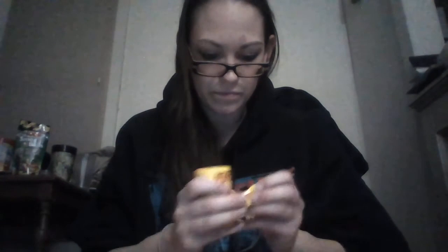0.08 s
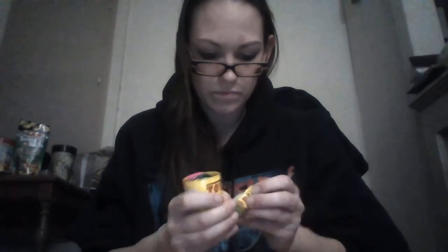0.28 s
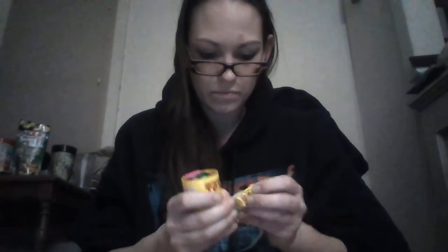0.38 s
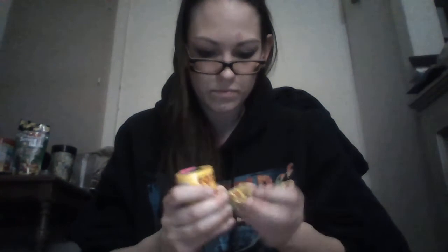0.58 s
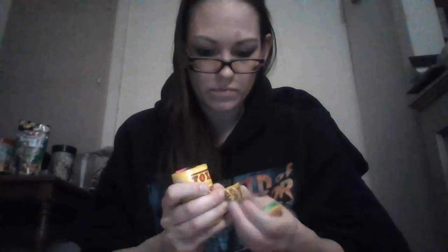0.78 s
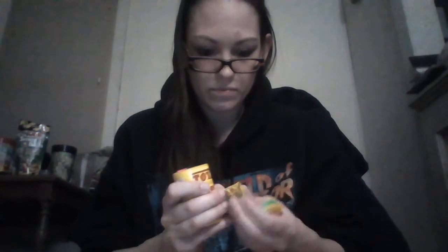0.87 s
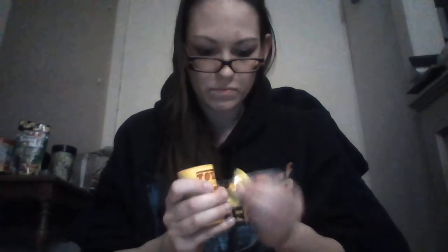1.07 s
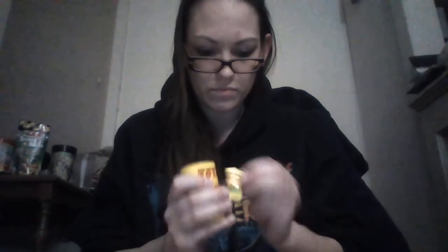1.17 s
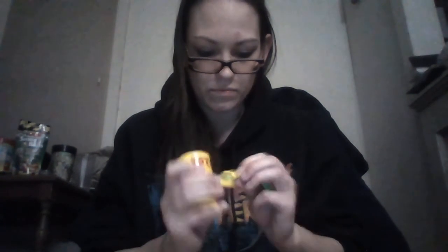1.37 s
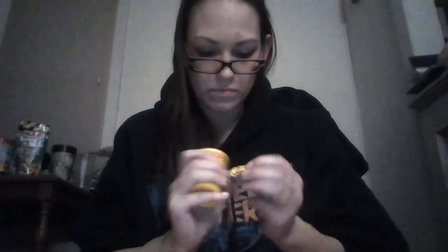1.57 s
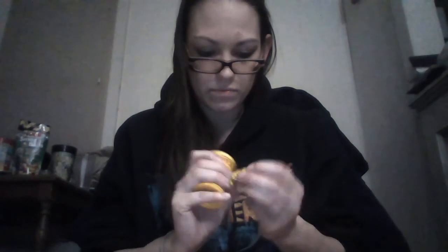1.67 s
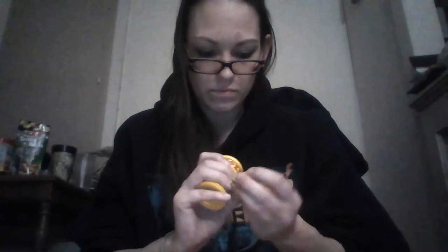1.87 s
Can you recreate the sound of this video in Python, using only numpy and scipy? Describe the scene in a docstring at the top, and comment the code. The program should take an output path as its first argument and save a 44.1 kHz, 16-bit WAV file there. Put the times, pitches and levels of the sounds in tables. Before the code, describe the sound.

Hands unwrap a small plastic-sealed tub indoors, with bright irregular crinkle clicks, brief scratchy rubbing and dull finger bumps; busiest before 1.2 seconds, then mostly quiet, the faint background hiss gated down between sounds.

```python
"""Unwrapping a small candy tub

Fingers pick and peel the plastic film off a small tub, close to the microphone in a small room.
Buckling film snaps: impulses ring its resonances. Rubbing is a train of tiny crackles in the same
resonances, sliding is noise in a few narrow ones, and finger bumps are short decaying tones with noise.
A noise suppressor turns each band down by up to 32 dB in the pauses; a limiter holds the loudest snaps."""
import sys
import numpy as np
from scipy import signal
from scipy.fft import rfft, irfft
from scipy.io import wavfile
from scipy.ndimage import uniform_filter1d, minimum_filter1d

SR = 44100
rng = np.random.default_rng(int(sys.argv[2]) if len(sys.argv) > 2 else 0)


def wrap_up_sound(samples):
    """Save the sound to the file named by the first command line argument, as 16-bit audio."""
    columns = np.atleast_2d(samples).T
    # keep every value between -1 and 1, then stretch to whole-number steps
    tamed = np.clip(columns, -1, 1)
    steps = np.round(tamed * 32767).astype(np.int16)
    wavfile.write(sys.argv[1], SR, steps)


N = 83790
TIME = np.arange(N) / SR

# resonances of the film, one list per register (deep, low, middle, high, top): # pitch_hz, width_hz,
# relative_level_db
FILM_REGISTERS = [
    [(965, 98, -5), (1175, 230, 2), (1714, 230, 9)],
    [(2362, 480, 0)],
    [(3550, 800, 0)],
    [(5386, 760, 0)],
    [(6732, 690, 20.5), (7600, 290, 10)],
]


def from_db(db):
    """Decibels are logarithmic: 20 dB is a tenfold amplitude gain."""
    return 10 ** (np.asarray(db) / 20)


def unit(x):
    """Energy is the sum of squared amplitudes; scale it to one."""
    return x / np.sqrt(np.sum(x ** 2) + 1e-30)


def coloured(x, spectrum):
    """Spectral shaping: weight each frequency of a noise, then scale to an energy of one."""
    hz, db = np.transpose(spectrum)
    bins_hz = np.fft.rfftfreq(len(x), 1 / SR) + 1   # the offset avoids log(0)
    gain = from_db(np.interp(np.log(bins_hz), np.log(hz), db))
    return unit(irfft(rfft(x) * gain, len(x)))


def resonate(x, hz, width_hz):
    """Stagger tuning: two resonators in a row, slightly apart, make a broad peak with steep skirts."""
    radius = np.exp(-np.pi * width_hz / np.sqrt(2) / SR)
    offset_hz = width_hz / np.sqrt(8)
    numerator = np.array([1, 0, -1]) * (1 - radius ** 2) / np.sqrt(2)
    for centre_hz in (hz - offset_hz, hz + offset_hz):
        denominator = [1, -2 * radius * np.cos(2 * np.pi * centre_hz / SR), radius ** 2]
        x = signal.lfilter(numerator, denominator, x + 1e-18)
    return x


def add(out, sound, start_s):
    """Superposition: sounds sum linearly from their start times."""
    i = max(int(start_s * SR), 0)
    out[i:i + len(sound)] += sound[:max(N - i, 0)]


def ring_film(force, modes):
    """Modal synthesis: a force rings the resonances of one register, retuned together each time."""
    pitch_scatter = 0.067   # every crease is tuned a little differently
    detune = 1 + pitch_scatter * rng.uniform(-1, 1)
    return sum(from_db(db) * resonate(force, hz * detune, width_hz) for hz, width_hz, db in modes)


def background_hiss():
    """Stationary noise: a faint random signal with a fixed spectrum."""
    # spectrum of the hiss: frequency_hz, relative_level_db
    hiss_colour = [(60, -12.5), (200, -10), (700, -11), (1500, -5), (4000, -7.5), (7000, 3), (8500, -12),
                   (10000, -34)]
    rms_db = -70
    return from_db(rms_db) * np.sqrt(N) * coloured(rng.standard_normal(N), hiss_colour)


def crackle_grains(n):
    """Stick-slip friction: sparse random impulses of uneven size whose strength flickers."""
    grains_per_s, spread_db = 1700, 3.7
    flicker_db, flicker_s = 1, 0.0013   # the grip sticks and slips
    signs = rng.choice([-1, 1], n)
    sizes = signs * from_db(spread_db * np.minimum(rng.exponential(1, n), 4))
    slow_noise = uniform_filter1d(rng.standard_normal(n), int(flicker_s * SR))
    flicker = np.sqrt(n) * unit(slow_noise)   # rms of one
    struck = rng.random(n) < grains_per_s / SR
    return sizes * struck * from_db(flicker_db * flicker)


def rubbing():
    """Friction-driven resonance: tiny crackles ring the film under the fingers; each grip retunes it."""
    # strokes of the fingers, and rms level per register: start_s, length_s,
    # low_level_db, middle_level_db, high_level_db, top_level_db
    strokes = [(0, 0.056, -62.5, -55, -51, -51), (0.078, 0.031, -66, -58, -58, -59),
               (0.196, 0.035, -61, -56.5, -53.5, -53.5), (0.263, 0.036, -76.5, -63, -51.5, -55),
               (0.307, 0.089, -89, -71.5, -53.5, -44.5), (0.41, .13, -64, -62.5, -68, -60.5),
               (0.55, .05, -69, -62.5, -66, -63), (0.696, 0.058, -71, -66.5, -60.5, -59),
               (0.825, 0.14, -58, -64, -62.5, -61), (0.962, 0.042, -46, -43, -40.5, -43),
               (0.999, 0.049, -56, -57, -56.5, -58), (1.122, 0.079, -61.5, -56.5, -59.5, -56),
               (1.209, 0.04, -63.5, -52.5, -52.5, -54.5), (1.342, 0.041, -82.5, -68.5, -65.5, -66.5),
               (1.408, 0.058, -65.5, -67, -59.5, -61.5), (1.482, 0.036, -73, -84, -87, -69),
               (1.806, 0.048, -78, -68.5, -70, -65.5)]
    edge_s = 0.0044
    deep_db = -6.5   # the deep register follows the low one
    grain_colour_db = 3.5   # every crackle has its own colour
    out = np.zeros(N)
    for start_s, length_s, low_db, *upper_db in strokes:
        t = TIME[:int((length_s + 2 * edge_s) * SR)]
        envelope = np.clip(np.minimum(t, t[-1] - t) / edge_s, 0, 1) ** 2
        grains = crackle_grains(SR // 4)
        levels_db = [low_db + deep_db, low_db, *upper_db]
        for modes, level_db in zip(FILM_REGISTERS, levels_db):
            force = grains * from_db(grain_colour_db * rng.standard_normal(len(grains)))
            ring = ring_film(force, modes)[:len(t)]
            add(out, from_db(level_db) * np.sqrt(len(t)) * unit(ring * envelope), start_s - edge_s)
    return out


def bumps():
    """Damped oscillation: fingers and nails knock softly on the tub and its rim, as tone plus dull noise."""
    # knocks: start_s, relative_peak_level_db, pitch_hz
    knocks = [(.005, -64, 530), (.1, -62.5, 215), (0.211, -62, 214.3), (0.236, -55.5, 410),
              (0.296, -58.5, 190), (.298, -51, 380), (.298, -59.5, 610), (0.365, -56.5, 290),
              (.4, -50.5, 115), (0.45, -54.5, 120), (0.484, -54, 580), (0.498, -61, 320), (.555, -68, 690),
              (0.573, -56.5, 170), (0.713, -54, 165), (0.711, -55.5, 335), (.716, -64, 720),
              (.84, -55, 240), (0.853, -46.5, 110), (.9, -59.5, 640), (0.95, -60.5, 330), (.95, -64.5, 110),
              (0.974, -63, 620), (1.02, -59.5, 330), (1.036, -56.5, 140), (1.126, -59.5, 130),
              (1.145, -60.5, 880), (1.16, -56, 310), (1.165, -60, 500), (1.186, -51.5, 110),
              (1.206, -53.5, 200), (1.211, -60, 330), (1.279, -61.5, 1580), (1.35, -64.5, 1900),
              (1.415, -65, 150), (1.446, -57, 295), (1.43, -63.5, 738), (1.485, -51, 1023),
              (1.485, -53, 1534), (1.485, -60.5, 2900), (1.492, -57.5, 620), (1.503, -68, 320.6),
              (1.514, -67.5, 820), (1.625, -62, 1560)]
    attack_s, decay_s, trim_db = 0.016, 0.0085, -3
    noise_share = 0.45   # amplitude of the noise beside the tone
    out, t = np.zeros(N), TIME[:SR // 8]
    envelope = (1 - np.exp(-t / attack_s)) ** 2 * np.exp(-t / decay_s)
    for start_s, level_db, hz in knocks:
        tone = unit(np.sin(2 * np.pi * hz * t))
        noise = unit(resonate(rng.standard_normal(len(t)), hz, hz))
        knock = envelope * (tone + noise_share * noise)
        add(out, from_db(level_db + trim_db) * knock / np.abs(knock).max(), start_s)
    return out


def buckle(slips=4):
    """Snap-through instability: the force jumps, rebounds, slips a few times and shivers out."""
    slip_span_s, slip_db = .001, -0.5
    rebound_s, rebound_db = 0.00076, -4.5   # the crease springs back, up to 30 % sooner or later
    shiver_s, shiver_db = 0.0036, -32   # the sheet shivers briefly
    t = TIME[:SR // 80]
    force = from_db(shiver_db) * rng.standard_normal(len(t)) * np.exp(-t / shiver_s)
    force[0] += 1
    rebound = int(rebound_s * rng.uniform(.7, 1.3) * SR)
    force[rebound] += from_db(rebound_db) * rng.choice([-1, 1])
    slip_at = (rng.random(slips) * slip_span_s * SR).astype(int)
    force[slip_at] += from_db(slip_db) * rng.standard_normal(slips)
    return force


def snaps():
    """Impulse excitation: each buckling rings the five registers with strengths of its own."""
    # film snaps, and relative level per register: peak_s,
    # deep_level_db, low_level_db, middle_level_db, high_level_db, top_level_db
    snap_events = [(0.0823, -48, -46.5, -39.5, -42, -43.5), (0.09, -55.5, -46, -40, -33, -39),
                   (0.1979, -80.5, -52, -46, -40, -37), (0.2352, -47, -45, -45.5, -46, -37.5),
                   (0.241, -36.5, -19.5, -11.5, -9.5, -6.5), (0.3091, -38.5, -32, -28.5, -18, -7.5),
                   (0.3633, -41, -36.5, -35, -15.5, -7.5), (0.4321, -44.5, -40.5, -36, -30, -22.5),
                   (0.4398, -45, -33, -35.5, -37, -27), (0.4817, -54, -33, -34.5, -31, -31),
                   (0.4846, -44.5, -32, -57, -30.5, -42), (0.5099, -56, -59, -62, -41, -44),
                   (0.5256, -55.5, -46, -47, -27.5, -28.5), (0.5691, -65, -58, -40, -37.5, -39),
                   (0.5935, -50, -57, -51.5, -81, -67), (0.7171, -59, -46.5, -39.5, -37.5, -47.5),
                   (0.7195, -51.5, -46, -33, -41, -32), (0.814, -61.5, -70, -44.5, -34.5, -39),
                   (0.8346, -33, -37, -21, -20, -15), (0.879, -35, -32.5, -25.5, -15, -17),
                   (0.8968, -42, -26, -21, -21.5, -22.5), (0.9013, -56, -46.5, -31, -20, -16),
                   (0.9281, -68, -56.5, -51.5, -28.5, -48), (0.9372, -56.5, -41.5, -49, -24.5, -27.5),
                   (0.9408, -54, -53.5, -27, -29, -30), (0.952, -41, -30, -18, -7, -26),
                   (0.9562, -32, -41.5, -22.5, -26, -32), (0.9644, -59, -49, -43, -29.5, -26),
                   (0.969, -34, -36.5, -20, -18, -20), (0.9928, -41.5, -38.5, -27, -27.5, -26.5),
                   (1.0257, -39, -34, -27, -31.5, -12.5), (1.0285, -43, -43.5, -37, -22, -27),
                   (1.1296, -66.5, -46.5, -40.5, -37.5, -33.5), (1.1354, -55, -57, -20.5, -23, -23.5),
                   (1.162, -58.5, -40.5, -28, -33, -35), (1.169, -48, -45.5, -32.5, -32.5, -22.5),
                   (1.1972, -49, -33.5, -31, -33, -34.5), (1.1997, -32, -23, -13, -11, -21.5),
                   (1.3572, -70, -78, -57.5, -38, -41), (1.4238, -39.5, -45.5, -37.5, -38.5, -46),
                   (1.4284, -45.5, -57, -34.5, -31.5, -31), (1.436, -48.5, -69, -41, -32.5, -44),
                   (1.4621, -78, -88, -69, -46, -42), (1.6376, -85, -84, -93, -51.5, -48.5),
                   (1.816, -86.5, -72.5, -43, -35.5, -34.5), (1.8928, -74, -40, -32, -37.5, -29)]
    lead_s, trim_db = .0004, -0.5   # the jump comes just before the peak
    out = np.zeros(N)
    scale = np.sqrt(.002 * SR)   # refers the level to rms over 2 ms
    for peak_s, *levels_db in snap_events:
        force = buckle()
        for modes, level_db in zip(FILM_REGISTERS, levels_db):
            ring = unit(ring_film(force, modes))
            add(out, from_db(level_db + trim_db) * scale * ring, peak_s - lead_s)
    return out


def sliding():
    """Smooth friction: a thin hiss holds a few narrow resonances of slowly sliding, taut film."""
    # slides: start_s, length_s, relative_level_db
    slides = [(.14, .05, -69), (.59, .115, -57)]
    # resonances of the stretched film: pitch_hz, width_hz, relative_level_db
    taut_modes = [(2200, 70, -11), (3900, 260, -3), (6900, 520, 0)]
    out = np.zeros(N)
    for start_s, length_s, level_db in slides:
        n = int(length_s * SR)
        ring = np.zeros(n)
        for hz, width_hz, mode_db in taut_modes:
            ring += from_db(mode_db) * unit(resonate(rng.standard_normal(n), hz, width_hz))
        faded = unit(ring * signal.windows.tukey(n, .5))
        add(out, from_db(level_db) * np.sqrt(n) * faded, start_s)
    return out


def room(x):
    """Room impulse response: convolve with near reflections, one wall's echo and a diffuse tail."""
    # spectrum of the diffuse tail: frequency_hz, relative_level_db
    tail_colour = [(200, 1.5), (1000, -4), (2200, 1), (3500, -2.5), (5200, 0.5), (6800, -1), (8200, 0.5),
                   (10000, 5.5)]
    t60_s, tail_delay_s, tail_db = 0.18, 0.0078, -16.5
    early_decay_s, early_db = 0.0034, -17   # reflections off hands and table
    echo_s, echo_smear_s, echo_db = 0.01, .0015, -24   # the nearest wall answers
    t = TIME[:SR // 2]
    tail = coloured(rng.standard_normal(len(t)), tail_colour)
    tail = tail * from_db(-60 * t / t60_s) * (t > tail_delay_s)
    early = rng.standard_normal(len(t)) * np.exp(-t / early_decay_s)
    echo = rng.standard_normal(len(t)) * np.exp(-np.abs(t - echo_s) / echo_smear_s) * (t > echo_s)
    response = from_db(tail_db) * unit(tail) + from_db(early_db) * unit(early)
    response = response + from_db(echo_db) * unit(echo)
    return signal.fftconvolve(x, response)[:N]


def scene():
    """Direct plus reflected sound: crumpled film sends a different form of each snap to the walls."""
    handling = rubbing() + bumps() + sliding()
    direct = snaps() + handling
    snaps_to_walls = (snaps() + snaps() + snaps() + snaps()) / 2   # four forms, summed by power
    reflected = room(snaps_to_walls + handling)
    return (direct + reflected + background_hiss())[None]


def suppressor(x, size=1024, smooth_bins=5):
    """Downward expansion: turn each frequency band down as it sinks below its threshold."""
    # level under which a band begins to shut: frequency_hz, threshold_db
    thresholds = [(60, -79), (250, -87), (700, -88.5), (1300, -85), (2200, -82.5), (4000, -84), (5500, -84),
                  (7000, -81.5), (9000, -88)]
    range_db, shut_db = 8.5, -32   # fully shut this far under the threshold
    overlap = size - size // 4
    hz, _, bands = signal.stft(x, SR, nperseg=size, noverlap=overlap)
    power = np.abs(uniform_filter1d(np.abs(bands) ** 2, smooth_bins, axis=0))
    level_db = 10 * np.log10(power + 1e-16)
    open_hz, open_db = np.transpose(thresholds)
    threshold_db = np.interp(np.log(hz + 1), np.log(open_hz), open_db)[:, None]
    shut = np.clip((threshold_db - level_db) / range_db, 0, 1)
    return signal.istft(bands * from_db(shut_db * shut), SR, nperseg=size, noverlap=overlap)[1][:N]


def limiter(x):
    """Peak limiting: a very fast gain, smoothed around each peak, holds the loudest snaps down."""
    ceiling, window_s = .93, .0012
    size = int(window_s * SR)
    needed_gain = ceiling / np.maximum(np.abs(x), ceiling)
    return x * uniform_filter1d(minimum_filter1d(needed_gain, size), size)


def record(dry):
    """Signal chain: noise suppression, peak limiting, then a steep low-pass that cuts off the top."""
    stop_hz = 9427   # 40 dB down from here on
    x = limiter(suppressor(dry[0]))
    low_pass = signal.cheby2(12, 40, stop_hz, fs=SR, output="sos")
    return signal.sosfilt(low_pass, x)[None]


dry = scene()
out = record(dry)
wrap_up_sound(out)
```